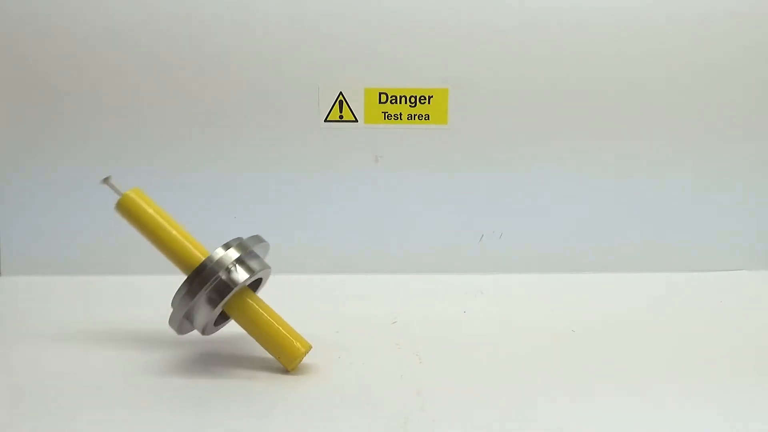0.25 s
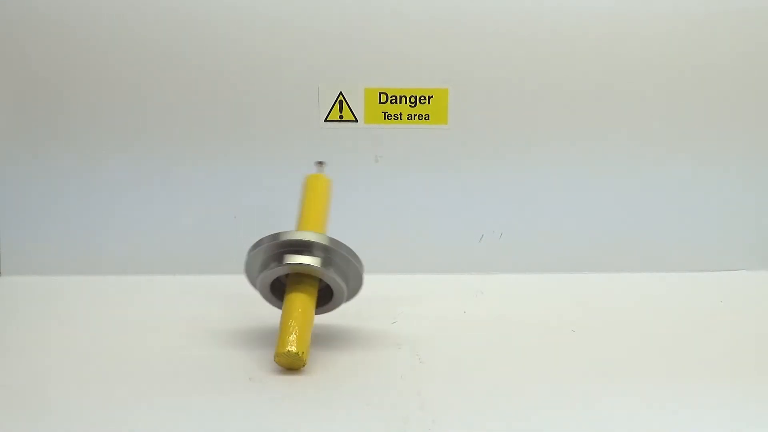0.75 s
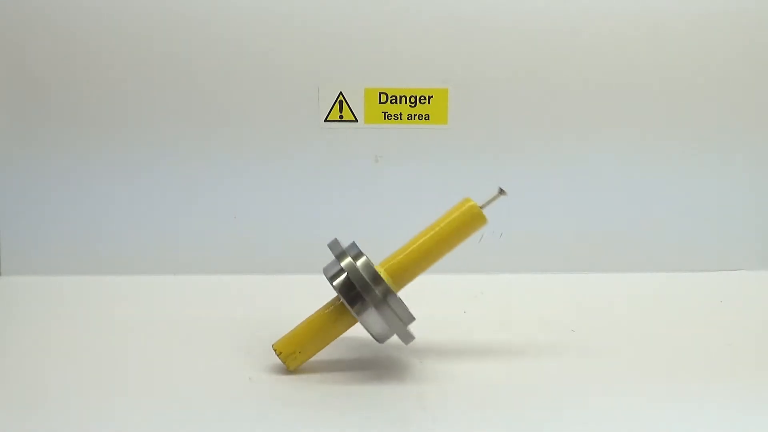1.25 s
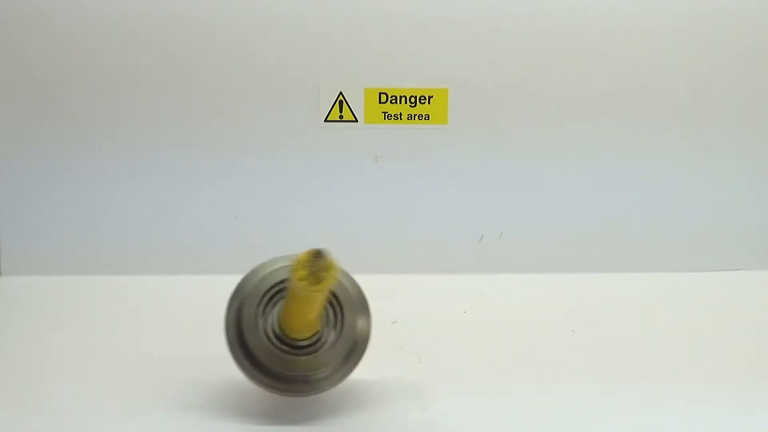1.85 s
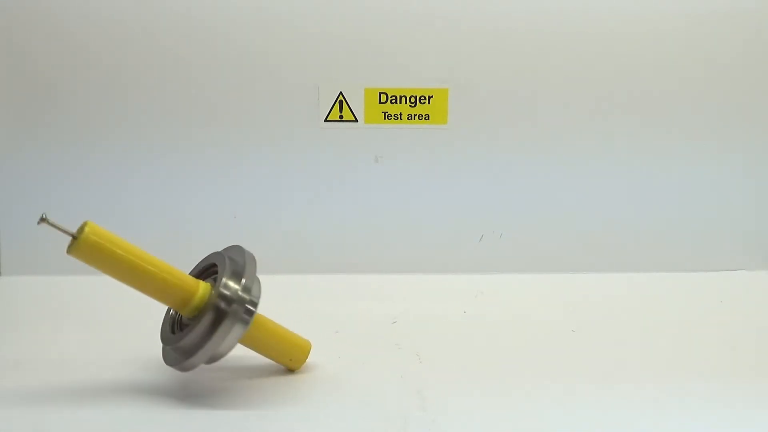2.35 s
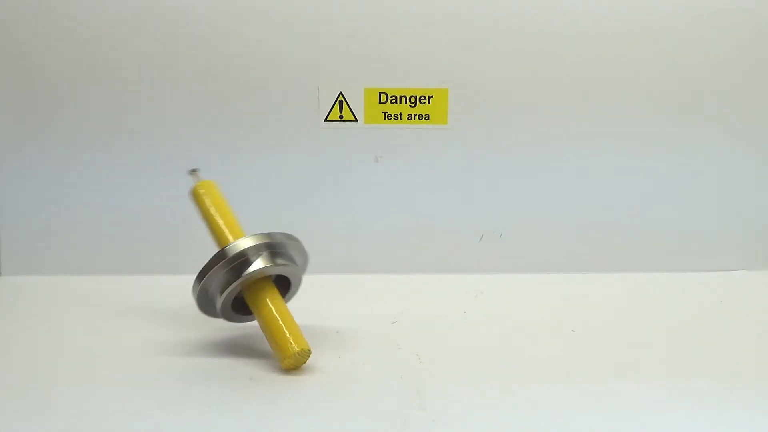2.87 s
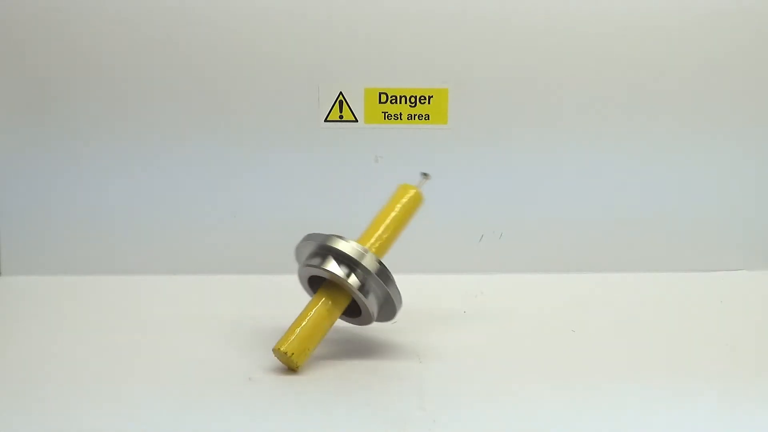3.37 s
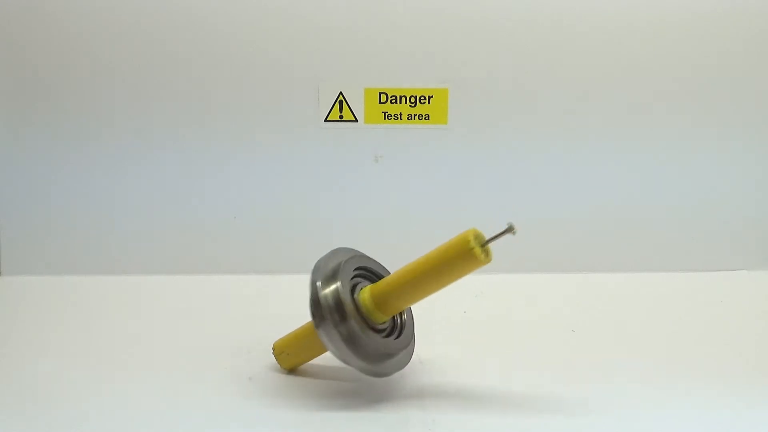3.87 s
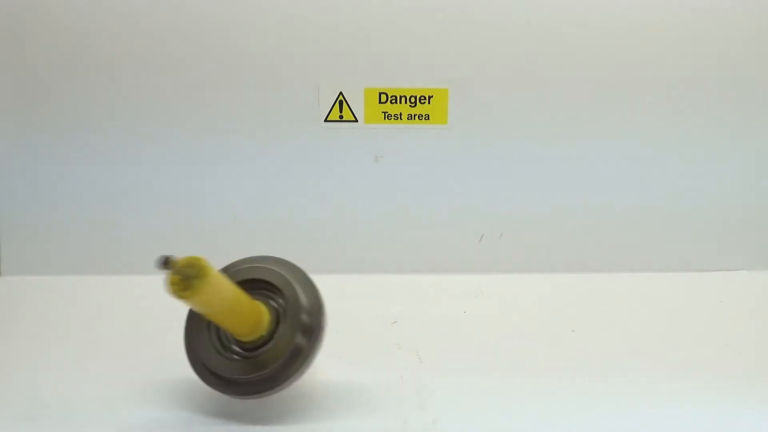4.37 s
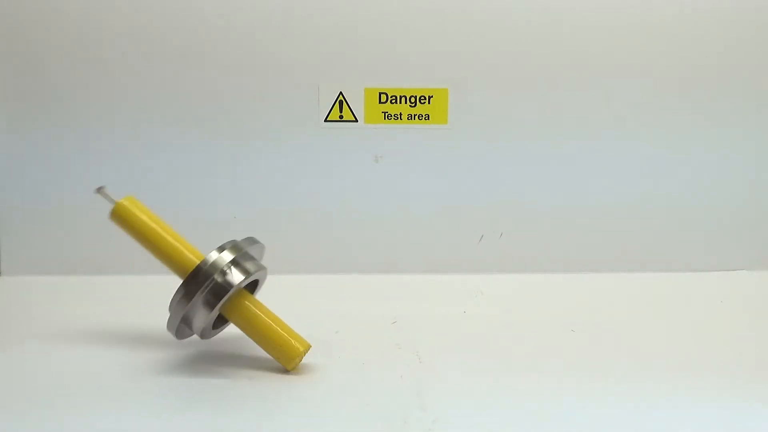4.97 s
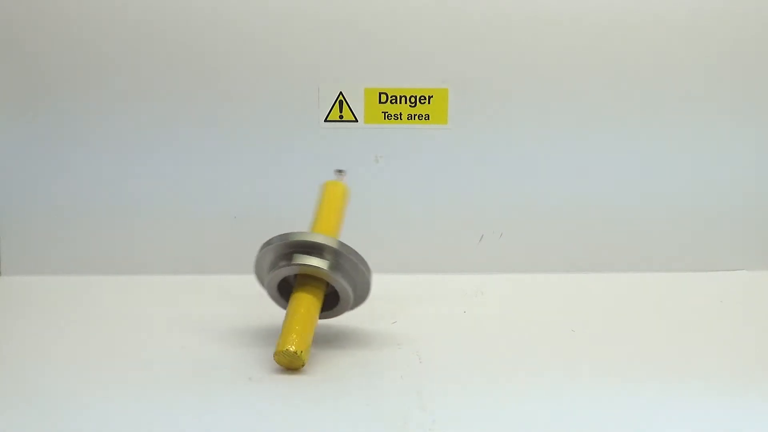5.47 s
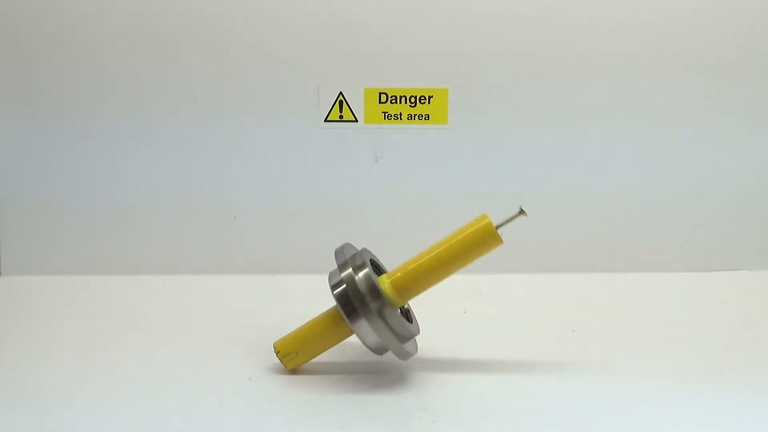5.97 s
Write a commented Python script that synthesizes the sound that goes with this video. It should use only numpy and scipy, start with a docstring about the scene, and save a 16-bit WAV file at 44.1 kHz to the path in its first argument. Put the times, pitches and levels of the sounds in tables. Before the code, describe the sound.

From 0 seconds a heavy steel flywheel is already spinning fast on ball bearings, its tilted axle balanced on a table and slowly circling. Countless tiny ball contacts merge into a continuous, gritty metallic whirr, bright and hissy, with a blurred high whine around 11 kHz that slides slightly up and down. Level and colour ripple in uneven swells as the axle turns; short echoes add a gentle phasing sweep. Near 1.9 seconds the axle points at the microphone and the treble turns sharper and more sizzling; around 3.1 it points away and the timbre changes again. The second facing pass comes near 4.3 seconds, with another turn away around 5.5. Beneath lie a faint table resonance, soft rumble and a wavering low hum near 100 Hz, sinking slightly as the wheel slows. Close microphone, almost dry small space, faint stereo width. The whirr continues to the end, about 6 seconds.

```python
"""A spinning steel flywheel coasts on ball bearings around a tilted axle whose tip stands on a table; the axle circles.
Dense random ball contacts ring the wheel and bearing resonances into a whirr and drive a high, sliding whine.
Both are beamed in lobes that sweep past the microphone, with echoes whose paths shift as the axle circles.
The same contacts ring the table top; unbalance and ball-pass tones hum over a soft noise rumble."""
import sys
import numpy as np
from scipy import signal
from scipy.fft import rfft, irfft
from scipy.io import wavfile

SR = 44100
rng = np.random.default_rng(int(sys.argv[2]) if len(sys.argv) > 2 else 0)


def output_pcm(signal):
    """Save a mono or channel-first signal as 16-bit PCM at the path in sys.argv[1].

    Samples are clipped to [-1, 1] before scaling.
    """
    pcm = np.clip(np.atleast_2d(signal).T, -1, 1) * 32767
    wavfile.write(sys.argv[1], SR, np.round(pcm).astype(np.int16))


N = 274302
TIME = np.arange(N) / SR
SIDES = np.array([[1], [-1]])  # left, right
START_SPIN_HZ, SLOWING_HZ_PER_S = 99.8, 1.42


def from_db(db):
    """Decibels to gain."""
    return 10 ** (np.asarray(db) / 20)


def rms_one(x):
    """Scale to an rms of 1."""
    return x / np.sqrt(np.mean(x ** 2) + 1e-20)


def band(x, edges_hz, kind, order=2):
    """Butterworth filter."""
    edges_hz = np.clip(edges_hz, 10, 0.45 * SR)
    return signal.sosfilt(signal.butter(order, edges_hz, kind, fs=SR, output="sos"), x)


def drift(rate_hz):
    """Smooth random wander of spread 1: noise through two equal poles at rate_hz."""
    step = 40  # samples between drawn points
    warm_up = 2000
    pole = np.exp(-2 * np.pi * rate_hz * step / SR)
    noise = rng.standard_normal(N // step + 2 + warm_up)
    slow = signal.lfilter([1], [1, -2 * pole, pole ** 2], noise)[warm_up:]
    return np.interp(np.arange(N) / step, np.arange(len(slow)), rms_one(slow))


def resonate(x, hz, width_hz):
    """A resonance applied twice for steep skirts; width_hz is that of one pass; rms 1."""
    b, a = signal.iirpeak(hz, hz / width_hz, fs=SR)
    once = signal.lfilter(b, a, x)
    return rms_one(signal.lfilter(b, a, once))


def spin_hz():
    """Turns per second of the coasting wheel, slowed evenly by friction."""
    return START_SPIN_HZ - SLOWING_HZ_PER_S * TIME


def axle_heading():
    """Radians from pointing at the microphone; precession is inversely proportional to the spin."""
    first_circle_s = 2.455  # one circle at the starting spin
    facing_at_s = 1.89
    circles = np.cumsum(START_SPIN_HZ / spin_hz()) / (first_circle_s * SR)
    return 2 * np.pi * (circles - np.interp(facing_at_s, TIME, circles))


def beam(heading):
    """Lobes, alike on both sides of a skewed axis, sweep past: dB of the table and wheel parts, whine centre."""
    skew_deg = 10
    # lobe pattern: off_axis_deg, table_top_db, low_wheel_db, high_wheel_db, bearing_ring_db,
    # whine_and_treble_db, whine_centre_hz
    pattern = [(0, 3.5, .5, 0, 1.7, -1.5, 10000), (25, -1.5, -1.2, -.9, -2.5, 0.4, 11230),
               (48, 1.6, 0.4, 3, 1.9, -1.5, 11300), (68.1, -2.5, -1.6, -1.6, -2.5, 0.9, 11220),
               (88, 0, 1.5, 0.4, 0, -.1, 11000), (108.1, 0.7, -0.5, 0.3, -.5, 0.3, 10930),
               (135.8, 1.5, -0.8, 2, -0.3, 0.1, 11330), (160, 2, 0, -0.35, 0.3, 0.8, 11540),
               (180.8, 1.5, -1, -2.8, 1.1, 1.7, 11460)]
    # extra level with the axle pointing left: table_top_db, low_wheel_db, high_wheel_db,
    # bearing_ring_db, whine_and_treble_db
    left_db = (0.22, -1.64, -1.3, -0.6, -0.6)
    off_axis_deg = np.degrees(np.arccos(np.cos(heading - np.radians(skew_deg))))
    degrees, *columns = np.transpose(pattern)
    *levels_db, whine_hz = [np.interp(off_axis_deg, degrees, column) for column in columns]
    return levels_db + np.outer(left_db, np.sin(heading)), whine_hz


def radiation_lobes(heading):
    """How squarely the axis points toward, away from and left of the microphone."""
    toward = np.exp(6 * (np.cos(heading) - 1))
    away = np.exp(3 * (-np.cos(heading) - 1))
    return np.array([toward, away, np.sin(heading)])


def ball_contacts():
    """Balls hit specks and pits in the races at random, with a few hard hits among many soft ones."""
    contacts_per_s, spread_db = 18000, 2.5
    born = rng.random(N) < contacts_per_s / SR
    size_db = spread_db * np.minimum(rng.exponential(1, N), 5)
    return born * from_db(size_db)


def whine(contacts, centre_hz):
    """The contacts drive a high ringing whose centre slides with the axle's angle to the microphone."""
    level_db, width_hz = -25, 830
    strikes = contacts * rng.standard_normal((2, N))
    for _ in range(2):
        strikes = band(strikes, width_hz / 2, "low", order=1)
    # shift the low-passed strikes up to the sliding centre
    phase = 2 * np.pi * np.cumsum(centre_hz) / SR
    ringing = strikes[0] * np.cos(phase) + strikes[1] * np.sin(phase)
    return from_db(level_db) * rms_one(ringing)


def beamed_mode(contacts, lobes, mode, rattle_db=1.5, rattle_hz=12.4):
    """One resonance, struck with its own strength by each contact and radiating in lobes."""
    hz, width_hz, level_db, *lobes_db = mode
    ringing = resonate(contacts * rng.standard_normal(N), hz, width_hz)
    return ringing * from_db(level_db + np.array(lobes_db) @ lobes + rattle_db * drift(rattle_hz))


def wheel_and_bearing(contacts, lobes, drive, whine_hz):
    """Contacts ring the wheel and bearing resonances and the whine, each scaled by its part's drive."""
    # resonances: centre_hz, width_hz, level_db, extra_toward_db, extra_away_db, extra_left_db
    modes = [(1400, 255, -43.5, -5.5, -3.5, 2), (1604, 172, -32.5, -11, -13.5, 1.5),
             (1734, 120, -38.5, -5, 2, 1.5), (1813, 194, -33, -5, -9.5, 2.5), (2012, 210, -50, 2, 3.5, 12),
             (2204, 220, -37.5, -14, -8.5, 1.5), (2310, 440, -37.5, -6.5, -9.5, 3.5),
             (2797, 180, -37.5, -9, -7, 1.5), (3197, 440, -34.5, -3.5, -4, 1.5),
             (3403, 176, -36, -4, 4, 3.5), (3655, 190, -37, -4, -2.5, -0.5), (3880, 500, -35, -3.5, 0, 1),
             (4250, 1100, -44.5, -3.1, 9, -1.5), (4520, 6200, -30.5, -1, 4.5, 1.5),
             (4850, 710, -34, -3.5, -7, 0), (5196, 190, -37, -11, -11.5, 1.5), (5740, 150, -40.5, 1, 1, 1),
             (6370, 1900, -29, -5.5, -1.5, 0), (6985, 510, -33.5, 10, 8, -0.5), (7170, 340, -37.5, 9, 1, 3),
             (7350, 96, -38.5, -10, -1, -5), (7563.0, 410, -29.5, 5.5, -2, 0.8),
             (8000, 76, -63, -0.4, -9, 12), (9270, 860, -36, -5, -6.5, 2),
             (10190, 250, -30.5, -8.5, -12, 1), (11240, 1670, -25, 5.5, -1, 1),
             (11740, 1100, -30, 4.5, -7, -3), (13060, 2200, -29.5, 5.5, 4, -0.5),
             (14600, 1756.0, -34, -8, -2, -1.1)]
    # splits between low wheel, high wheel, bearing ring and treble: edge_hz
    part_edges = (2500, 6000, 8500)
    sound = drive[-1] * whine(contacts, whine_hz)
    for mode in modes:
        part = np.digitize(mode[0], part_edges)
        sound += drive[part] * beamed_mode(contacts, lobes[part], mode)
    return sound


def with_echoes(x, heading):
    """Echoes from table and backdrop change their paths as the wheel circles, sweeping combs through the whirr."""
    dull_hz, scatter_db, count = 4500, -16, 8
    swing_s, nearest_s, farthest_s = 0.000415, 0.001775, 0.009
    # close reflections: delay_s, extra_toward_s, extra_left_s, signed_gain
    paths = list([(0.001303, 0.000272, 0.00011, 0.17), (0.000907, 0.0002, 0.00012, -0.069),
                  (0.00115, 0.00018, 0.0002, 0.14), (0.00156, 0.00046, 0.00007, -0.07)])
    for place, toward, left, sign in rng.uniform(-1, 1, (count, 4)):
        delay_s = nearest_s + abs(place) * (farthest_s - nearest_s)
        paths.append((delay_s, toward * swing_s, left * swing_s, np.sign(sign) * from_db(scatter_db)))
    # the echoes are duller than the direct whirr
    dulled = band(x, dull_hz, "low", order=1)
    fine = signal.resample_poly(dulled, 4, 1)  # finer grid for moving delays
    fine_time = np.linspace(0, N / SR, len(fine), endpoint=False)
    out, cos, sin = x.copy(), np.cos(heading), np.sin(heading)
    for delay_s, toward_s, left_s, gain in paths:
        arrival = TIME - delay_s - toward_s * cos - left_s * sin
        out += gain * np.interp(arrival, fine_time, fine)
    return out


def table_top(contacts, lobes):
    """The contacts also ring the table top's resonances."""
    # resonances: centre_hz, width_hz, level_db, extra_toward_db, extra_away_db, extra_left_db
    modes = [(485.5, 118, -43.5, -5.5, -0.5, -1.9), (625, 110, -48.5, -1.5, 0.5, 0.59),
             (839, 166, -45.5, -12, -7, 0.72), (1060, 194, -40.0, -8.5, -5.0, 0.97)]
    return sum(beamed_mode(contacts, lobes, mode) for mode in modes)


def hum(waver_db=1.0, slip_radians=0.36):
    """Unbalance gives a clean tone at the spin rate; cage and ball-pass tones waver as the balls slip."""
    # level of the once-per-turn tone: time_s, level_db
    unbalance = [(0.04, -48), (0.26, -40), (0.77, -39), (2.43, -46.5), (2.51, -44), (3.25, -39), (4.9, -48),
                 (5.06, -46.5), (6.14, -47.5), (6.17, -49)]
    # cage and ball-pass tones: multiple_of_spin, level_db
    bearing_orders = [(0.675, -62), (1.674, -49.5), (1.836, -59), (2.251, -61.5), (2.603, -52),
                      (3.081, -59.5), (3.25, -59), (4.34, -63), (4.495, -51.5), (4.594, -60.5),
                      (4.952, -48), (6.746, -56.5), (8.997, -53)]
    angle = 2 * np.pi * np.cumsum(spin_hz()) / SR
    tones = from_db(np.interp(TIME, *np.transpose(unbalance))) * np.sin(angle)
    for multiple, level_db in bearing_orders:
        phase = multiple * angle + rng.uniform(0, 2 * np.pi) + slip_radians * drift(1.5)
        tones += from_db(level_db + waver_db * drift(3.8)) * np.sin(phase)
    return np.sqrt(2) * tones  # levels are rms


def rumble(level_db=-47.5):
    """Band-limited noise under the hum."""
    return from_db(level_db) * rms_one(band(rng.standard_normal(N), [42, 380], "band"))


def room(x, level_db=-17, t60_s=0.038):
    """A short, faint diffuse tail of decaying noise, opposite in sign on the two sides."""
    # colour of the tail: frequency_hz, level_db
    colour = [(60, -22), (300, 9.5), (600, -7), (1700, -6.5), (2600, -35), (6500, -42), (9500, -36),
              (11000, -1.5), (15000, -48)]
    age_s = TIME[:SR // 4]
    tail = rng.standard_normal(len(age_s)) * from_db(-60 * age_s / t60_s) * (age_s > 0.004)
    hz, colour_db = np.transpose(colour)
    bins_hz = np.fft.rfftfreq(len(age_s), 1 / SR)
    gain = from_db(np.interp(np.log(bins_hz + 1), np.log(hz), colour_db))
    tail = irfft(rfft(tail / np.linalg.norm(tail)) * gain, len(age_s))
    return from_db(level_db) * SIDES * signal.fftconvolve(x, tail)[:N]


def scene(table_pan_db=-0.07, bass_pan_db=1.3):
    """Wheel, whine and table top share the ball contacts; hum and rumble lie below."""
    rattle_db, rattle_hz = 1.74, 134
    load_wander_db, load_wander_hz = 0.5, 1.9
    # turn of the lobes from the axle: low_wheel_deg, high_wheel_deg, bearing_ring_deg, treble_deg
    lobe_turns = (3.5, 8, 18, -1)
    heading = axle_heading()
    (table_db, *drive_db), whine_hz = beam(heading)
    drive = from_db(drive_db)
    # play in the bearing shakes the wheel unevenly
    drive[:2] *= from_db(rattle_db * drift(rattle_hz))
    # the load on the balls wanders
    drive[:-1] *= from_db(load_wander_db * drift(load_wander_hz))
    lobes = [radiation_lobes(heading - np.radians(turn_deg)) for turn_deg in lobe_turns]
    contacts = ball_contacts()
    whirr = with_echoes(wheel_and_bearing(contacts, lobes, drive, whine_hz), heading)
    table = from_db(table_db) * table_top(contacts, lobes[0])
    bass = hum() + rumble()
    # the bass leans a little to the left
    direct = whirr + table * from_db(table_pan_db * SIDES) + bass * from_db(bass_pan_db * SIDES)
    return direct + room(whirr + table + bass)


def record(dry):
    """The top is cut steeply by an elliptic low-pass."""
    cutoff_hz = 15700
    return signal.sosfilt(signal.ellip(12, 0.1, 80, cutoff_hz, fs=SR, output="sos"), dry)


dry = scene()
out = record(dry)
output_pcm(out)
```